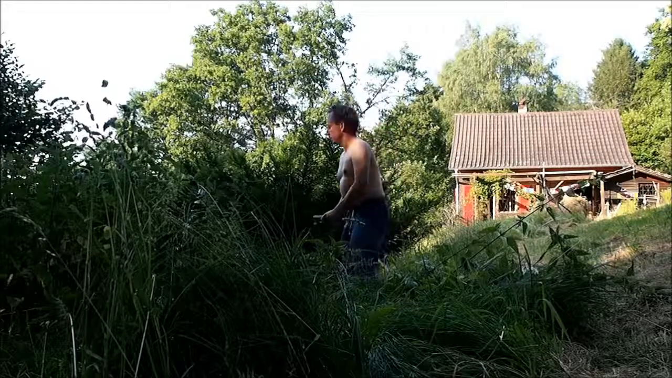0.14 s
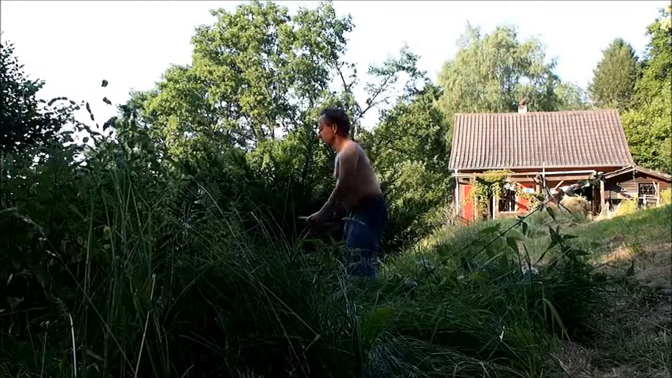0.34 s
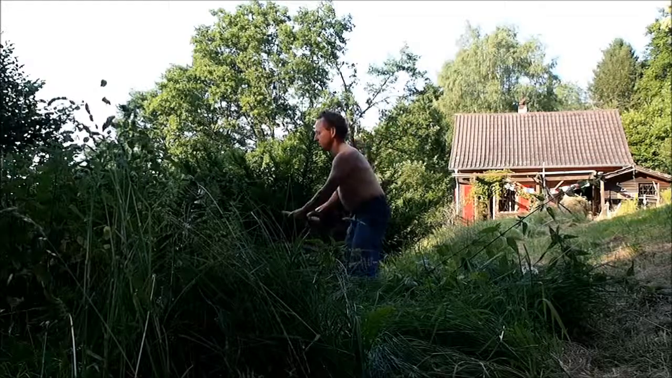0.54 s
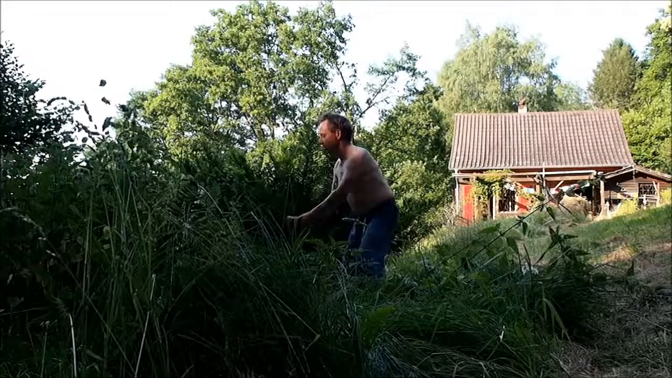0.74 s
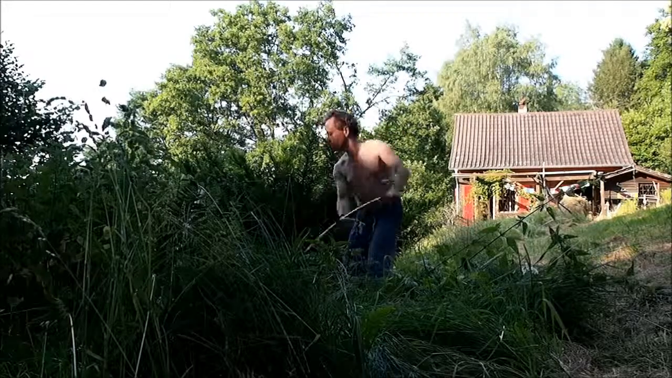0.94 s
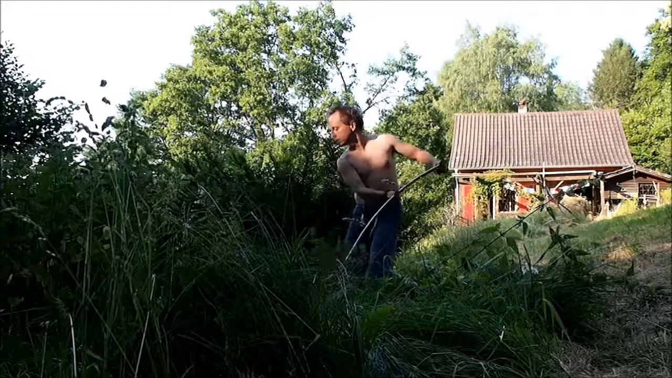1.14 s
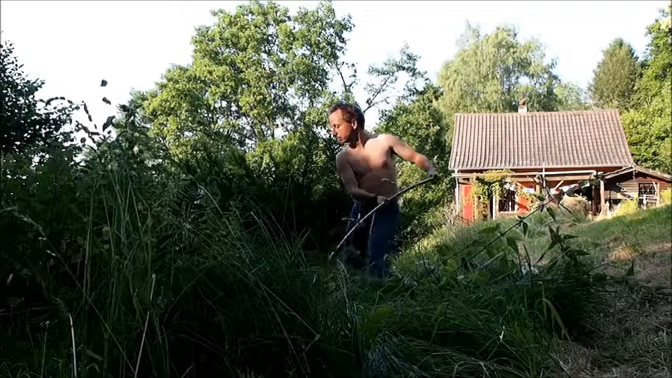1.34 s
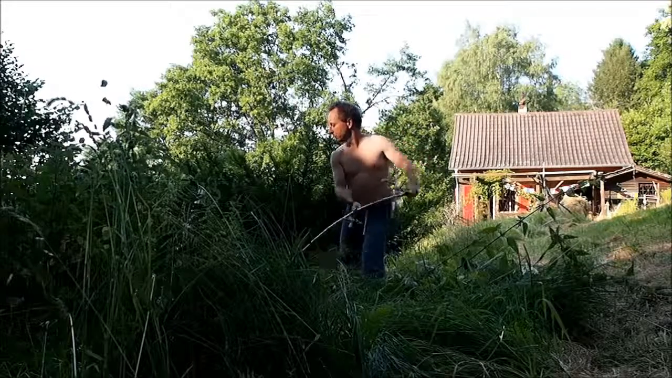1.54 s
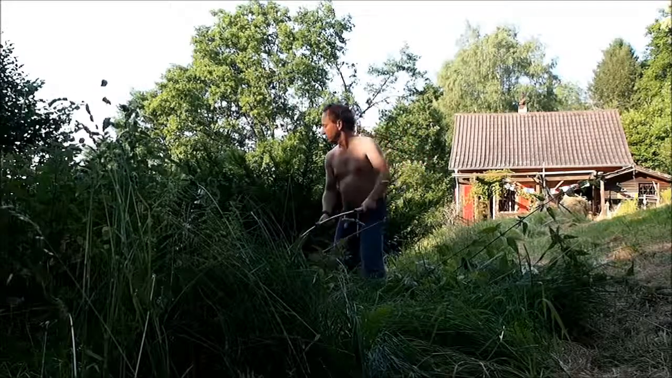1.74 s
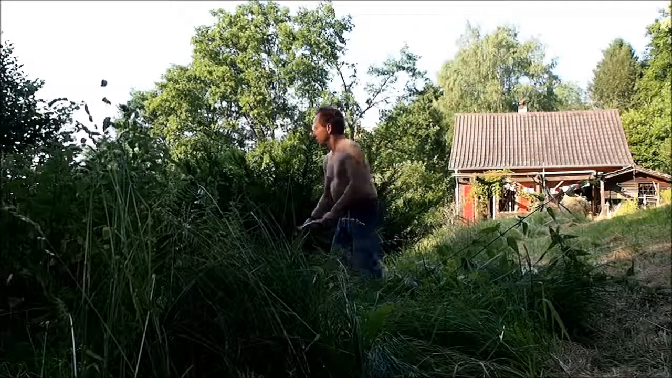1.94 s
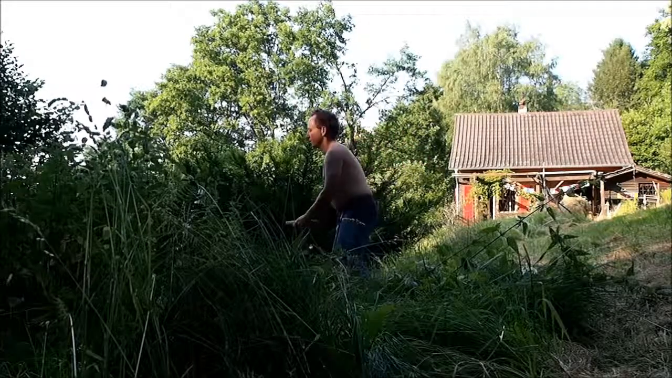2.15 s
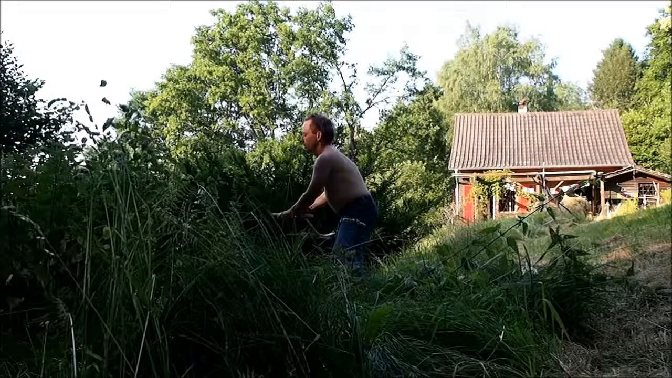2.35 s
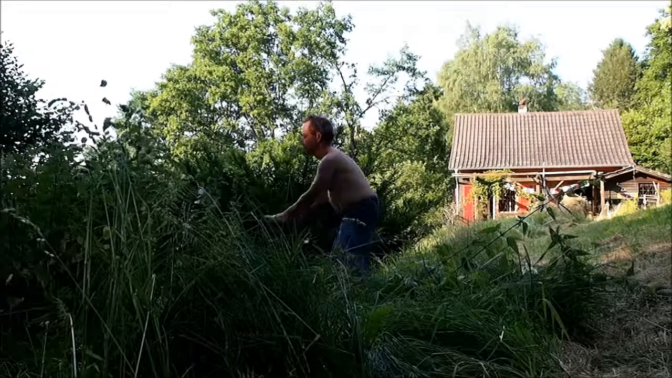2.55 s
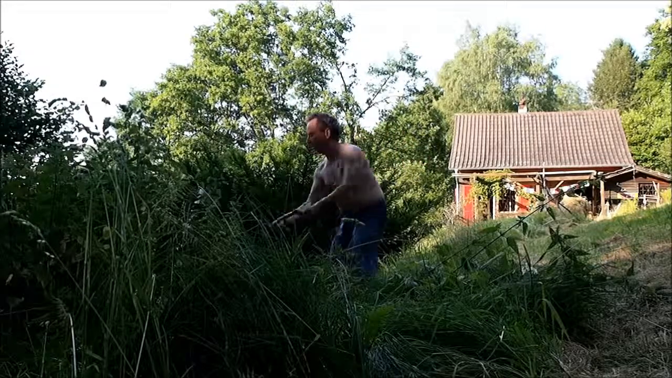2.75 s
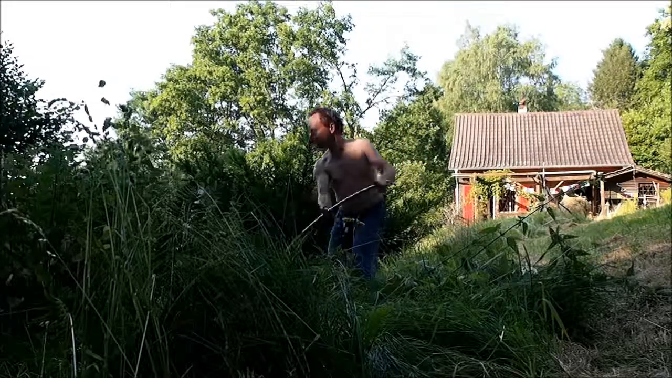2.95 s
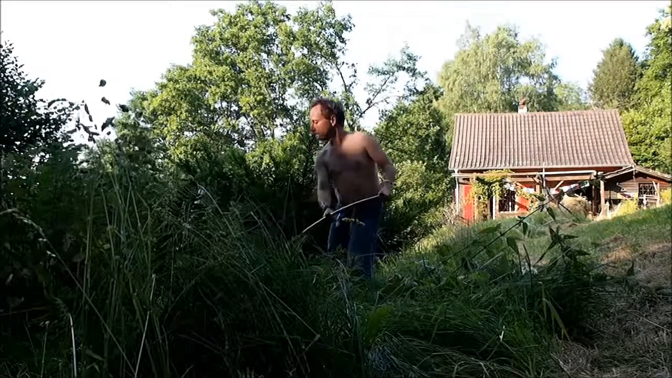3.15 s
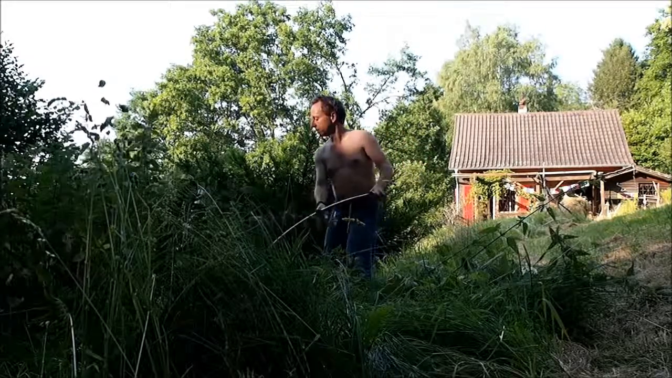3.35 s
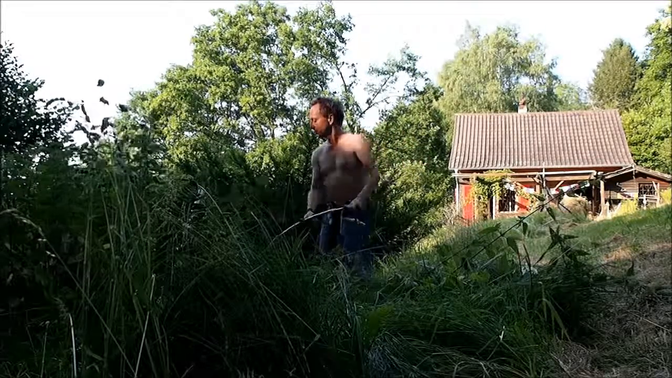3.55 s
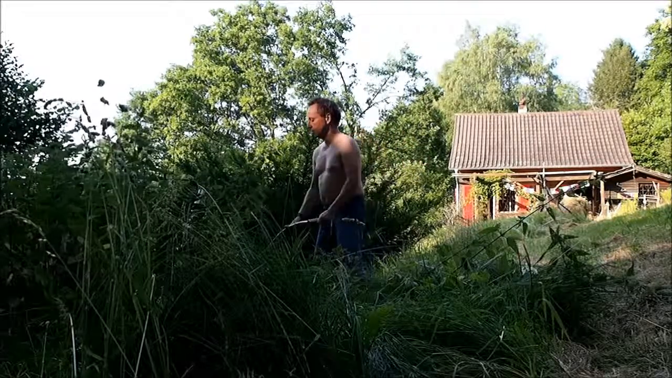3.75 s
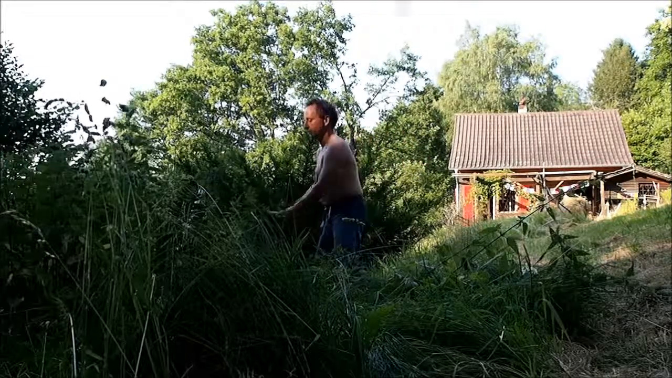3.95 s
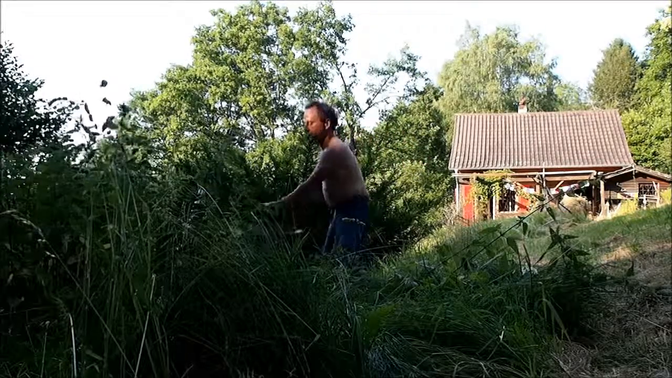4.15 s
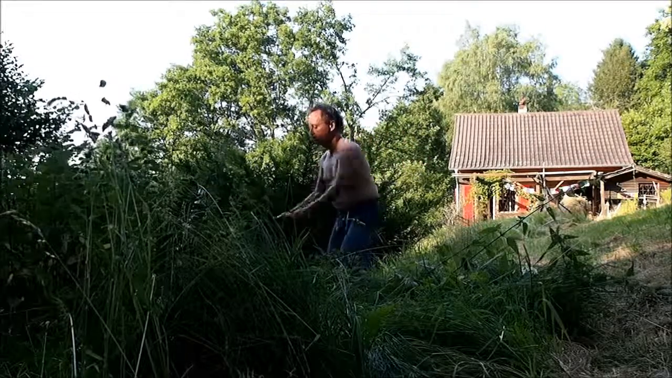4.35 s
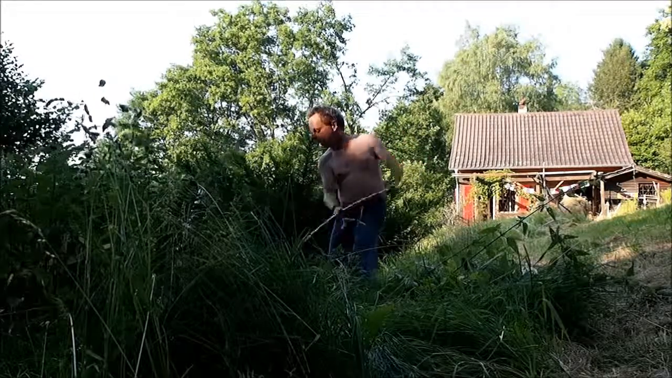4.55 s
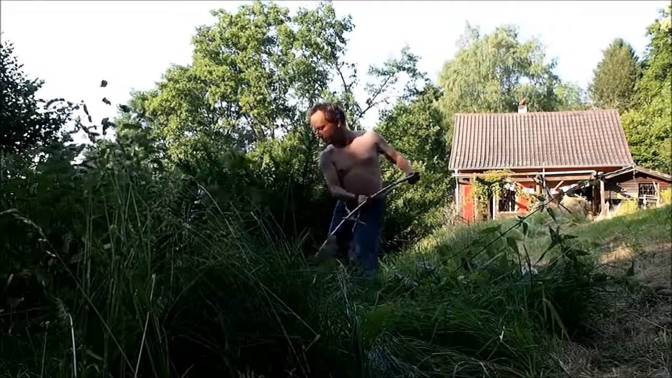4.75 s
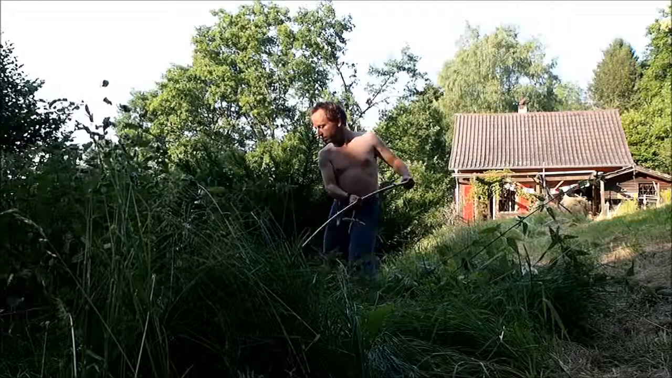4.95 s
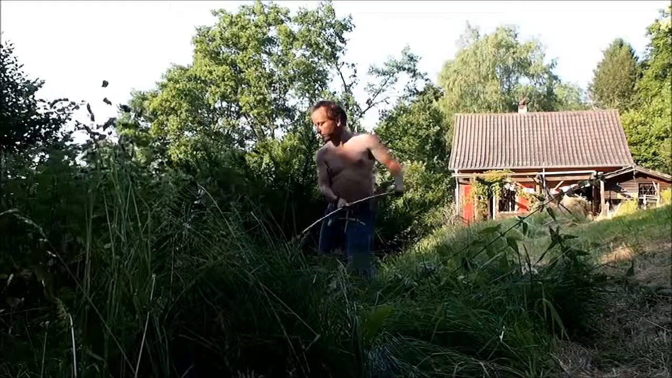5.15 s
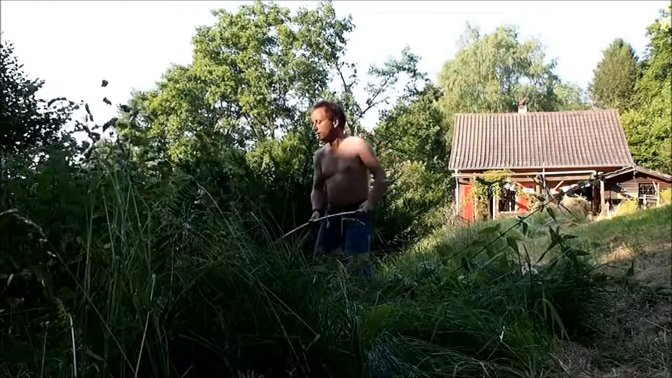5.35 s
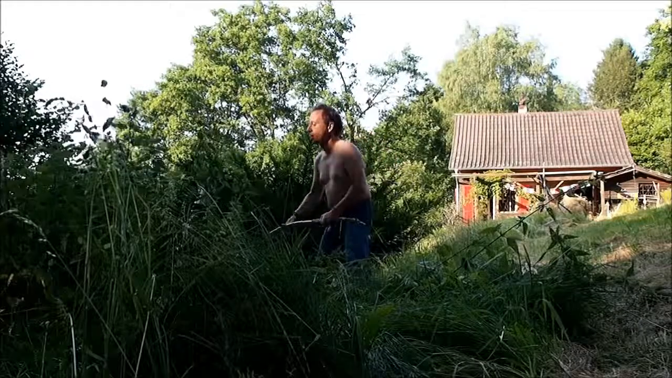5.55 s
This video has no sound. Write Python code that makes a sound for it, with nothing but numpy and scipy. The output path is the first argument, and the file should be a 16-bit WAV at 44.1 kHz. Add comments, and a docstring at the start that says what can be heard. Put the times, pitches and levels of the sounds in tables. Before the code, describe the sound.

A steady, broad rush of open air fills the stereo space, with grass stirring very faintly. In the first 0.8 seconds there are light tussock rustles and tiny dry snaps. At about 0.8 seconds the scythe bites: a quick, bright hiss swells with crunching stalks, crackling tufts and a soft low thud, gone by 1.1. The blade then draws back through cut grass, a softer rustle until about 1.7, with steel pings, stubble scraping and slight wooden knocks around 1.6 to 1.85. Faint brushing follows. A second, shorter and more abrupt stroke comes at 2.7, with sharp stem snaps and a damped metallic touch, then a rustling return from 3.0 to 3.5 and a brief brush near 3.6. The third stroke slices at 4.4 to 4.6, followed by a longer, gradually duller return until 5.6, with delicate steel ticks and handle knocks near 5.2 and 5.4.

```python
"""A scythe mows tall grass on a mountain meadow over the steady rush of the open air, filtered noise.
At first tussocks rustle as grains of rubbing fibre, and dry stems snap as resonant clicks.
Then come three strokes: fibre clicks hiss and crunch, tufts burst in decaying cracks, the swath thuds.
During and after the strokes, touches excite the blade's decaying modes. After each, the blade is drawn
back through rustling cut grass; stubble ticks along the steel and a few knocks ring the wooden handle."""
import sys
import numpy as np
from scipy import signal
from scipy.fft import rfft, irfft, next_fast_len
from scipy.io import wavfile

SR = 44100
rng = np.random.default_rng(int(sys.argv[2]) if len(sys.argv) > 2 else 0)


def unload_wav(signal):
    """Save mono or channel-first audio to the path in sys.argv[1] as 16-bit WAV at rate SR, clipped to [-1, 1]."""
    wavfile.write(
        sys.argv[1],
        SR,
        np.round(np.clip(np.atleast_2d(signal).T, -1, 1) * 32767).astype(np.int16),
    )


N = 250929
TIME = np.arange(N) / SR

# Spectrum of the open air: f/Hz, relative level per Hz/dB
AIR_SPECTRUM = [(15, -43), (25, -31), (59, -1), (185, -4), (242, -9), (277, -7), (394, -12.5), (607, -6.5),
                (775, -6.5), (1130, -6), (1790, -11.5), (3250, -12), (5140, -17), (6560, -15),
                (16000, -25.5)]
# Share of power common to left and right in the open air: f/Hz, correlation/1
AIR_CORRELATION = [(30, 0.96), (100, 0.91), (500, 0.71), (1100, 0.7), (1800, 0.24), (3500, 0.028),
                   (15000, .05)]
# The same share for the grass: f/Hz, correlation/1
GRASS_CORRELATION = [(130, 0.86), (640, 1), (1300, 0.84), (2000, 0.83), (3000, 0.76), (4100, 0.53),
                     (6200, 0.74), (7500, 0.36), (11500, 0.17), (12800, 0), (15000, 0.02)]
# Left-right level difference of the near sounds: f/Hz, level/dB
STEREO_BALANCE = [(100, -0.5), (900, 1.1), (1900, -3), (2600, 0), (3600, -3), (5500, 0.3), (7200, -2.5),
                  (9500, 3), (11000, 1), (12100, -2), (13300, 9), (15000, -7)]
# Single tussocks brushed: middle t/s, rustle level/dB, Gaussian half length/s, treble level re rustle/dB
TUSSOCK_BRUSHES = [(0.01, -59.5, 0.02, 4.5), (0.423, -55, 0.075, -1.5), (0.73, -61, 0.027, -3),
                   (0.82, -50, 0.009, 3), (1.62, -38.5, 0.04, -6), (1.835, -43.5, 0.03, -7),
                   (2.12, -57, 0.066, 1), (2.296, -53, 0.055, -1), (2.575, -53.5, 0.13, -6),
                   (3.615, -40, 0.007, -11), (3.72, -47, 0.053, -6), (4.942, -41.5, 0.046, -0.5),
                   (5.243, -43, 0.051, -13)]
# Blade drawn back through the cut grass: start t/s, end t/s, rustle level/dB
RETURN_SWEEPS = [(1.123, 1.68, -42), (2.972, 3.504, -41.5), (4.714, 5.614, -42.5)]
# Spectrum of the rustle: f/Hz, relative level per Hz/dB
RUSTLE_SPECTRUM = [(100, -7.5), (250, -5.5), (420, -13), (620, -6), (1200, 2.5), (2100, -3.5), (2900, -2),
                   (4000, 1.5), (5500, 0.5), (7000, -5), (9000, -10.5), (16000, -32)]
# Spectrum of its treble: f/Hz, relative level per Hz/dB
RUSTLE_TREBLE_SPECTRUM = [(3000, -18), (6500, -0.5), (8500, 0.5), (11000, -2), (12600, -8), (14000, -5.5),
                          (16000, -10)]
# Resonances colouring the rustle: f/Hz, bandwidth/Hz, mean level/dB
RUSTLE_RESONANCES = [(3095, 270, 3.5), (6310, 550, 2)]
# Single dry stems snapping: t/s, relative level/dB, left-right level/dB
STEM_SNAPS = [(0.3975, -29, -3), (0.7642, -27.5, -4), (1.0218, -8, 2), (1.1018, -8.5, -2),
              (1.5896, -14.5, 2), (2.726, -6, 3), (2.801, -1, 4), (2.8865, -3, 5), (2.906, -11, 3),
              (3.6114, -31, -1.5), (4.9544, -21, -0.5)]
# Cutting strokes: first contact t/s, full speed t/s, leaving the stand t/s, rise to full speed/dB,
# sag as grass slows the blade/(dB/s), relative levels of hiss, crunch and thud/dB,
# treble spray re hiss/dB, spray delay after contact/s
CUTTING_STROKES = [ (0.803, 0.89, 1.09, 30, 52, -20, -29.5, -41.5, 4, 0.08),
                   (2.682, 2.797, 2.858, 14.3, 20, -21, -29, -42, 5.5, 0.03),
                   (4.402, 4.491, 4.598, 27, 62, -18.2, -27.6, -37.5, 3, 0.1)]
# Spectrum of sheared thin blades: f/Hz, relative level per Hz/dB
SHEAR_SPECTRUM = [(900, -39), (2100, -9.5), (2700, 1), (4000, -0.5), (5500, 1), (7000, -2), (8000, -1.5),
                  (11000, -4), (12600, -11), (14000, -8.5), (16000, -14)]
# Spectrum of crunching thick stalks: f/Hz, relative level per Hz/dB
CRUNCH_SPECTRUM = [(250, -29), (430, -18.5), (580, -3.5), (780, -6.5), (1050, 2.5), (1500, 3.5), (2000, -5),
                   (2800, -8), (5000, -29)]
# Spectrum of the shoved swath: f/Hz, relative level per Hz/dB
THUD_SPECTRUM = [(30, -32), (70, -3), (130, 5.5), (260, 4.5), (340, -0.5), (450, -26), (900, -33)]
# Resonances colouring the cutting hiss: f/Hz, bandwidth/Hz, mean level/dB
SHEAR_RESONANCES = [(2800, 27, -3), (3130, 120, -2.5), (3460, 18, 3), (4420, 31, -14), (4540, 33, -3),
                    (4870, 57, 0), (5400, 37, -12), (6170, 310, -6), (6800, 82, 4.5)]
# Resonances of the thick stalks: f/Hz, bandwidth/Hz, mean level/dB
STALK_RESONANCES = [(1250, 120, -12), (1830, 48, 2), (1874, 18, 2.5)]
# Edge biting into tufts: t/s, relative level/dB, stalk f/Hz, bandwidth/Hz, relative pitched level/dB
TUFT_BITES = [(0.830, -17.5, 3980, 100, -10), (0.867, -13, 1320, 110, 3.5), (0.869, -18, 3050, 500, 9),
              (0.899, -2, 1820, 100, -10), (0.918, -18, 1330, 120, 5), (0.935, -17, 2820, 150, 8),
              (0.978, -11.5, 3040, 200, 4.5), (2.684, -21.5, 1320, 300, 4), (2.7134, -12.5, 3670, 900, 3),
              (2.764, -9, 3200, 150, -8), (2.785, -17, 3130, 100, 8), (2.867, -7, 3300, 200, -6),
              (4.400, -25, 3900, 300, -2), (4.417, -20.5, 3300, 600, 4), (4.464, -23, 3370, 800, 10),
              (4.466, -22, 1870, 400, 12.5), (4.477, -16, 2680, 700, 13), (4.481, -19, 3560, 60, 5),
              (4.522, -8, 4630, 100, 0)]
# Touches on the steel: t/s, relative level/dB, most excited f/Hz, share of free ring time left by grass/1
STEEL_TOUCHES = [(0.831, -19, 3950, 0.8), (1.567, -20, 3044, 0.6), (1.599, -20, 3790, 0.8),
                 (1.630, -23.5, 2722, 0.95), (1.649, -22.5, 4160, 1), (1.652, -22, 5300, 1),
                 (1.69, -25.5, 4170, 1), (1.796, -25, 3790, 0.7), (1.83, -31, 2722, 1),
                 (1.836, -23.5, 6192, 0.8), (2.685, -6, 6500, 0.19), (2.713, -10, 3950, 0.54),
                 (3.269, -28, 3044, 0.6), (3.703, -34, 3044, 0.6), (4.417, -18, 3512, 1),
                 (5.245, -29, 2722, .9), (5.246, -30, 3512, 1), (5.279, -30, 3044, 1),
                 (5.28, -29, 4420, 0.85), (5.394, -28, 3044, 0.5), (5.409, -30.5, 2722, 0.9)]
# Modes of the free blade: f/Hz, relative level/dB, t60/s
BLADE_MODES = [(2722, 0, .45), (3044, -1, .35), (3512, -3, .2), (3790, -4, .3), (3950, -4, .25),
               (4091, -3, .36), (4204, -2, .36), (4400, -3, .4), (4762, -6, .4), (5120, -5, .3),
               (5459, -5, .27), (6192, -2, .2), (6500, -6, .15), (7005, -5, .22), (7700, -9, .28)]
# Blade dragging over stubble: middle t/s, relative level/dB, Gaussian half length/s
STUBBLE_SCRAPES = [(1.604, -36, 0.023), (1.666, -38.5, 0.026), (1.798, -41, 0.011), (3.273, -48, .012),
                   (5.175, -39.5, 0.028), (5.27, -48, 0.021)]
# Knocks on the wooden handle: t/s, relative level/dB
HANDLE_KNOCKS = [(1.699, -29), (1.731, -33), (3.611, -36), (5.243, -31), (5.389, -31.5)]
# Modes of the handle: f/Hz, relative level/dB, t60/s
HANDLE_MODES = [(1065, -1, 0.039), (1500, -9, 0.033), (1920, -3, 0.048), (2520, -3, 0.029),
                (3100, -17, 0.018), (3750, 2, 0.024)]

AIR_DB = -46.5   # before the level given in scene()
STIR_DB, STIR_TREBLE_DB = -59.5, -9.5   # the standing grass never quite rests
RETURN_ATTACK_S, RETURN_RELEASE_DB_PER_S = 0.035, 85
RETURN_TREBLE_DB, DULLING_DB_PER_S = -3, -4.5   # treble re the rustle, duller as the swath settles
EXIT_DB, EXIT_S, RELEASE_DB_PER_S = 3, 0.024, 92.5   # the edge comes free, then the cut dies away
CRUNCH_LEAD_S, THUD_LAG_S = 0.0021, 0.018   # thick stalks part first, the swath follows
SPRAY_START_DB, SPRAY_RISE_S = -4, 0.016   # treble is held back until the blade gathers speed
TUFT_T60_S = 0.09
CUTOFF_HZ = 15900


def from_db(db):
    """Amplitude ratio of a level in decibels."""
    return 10 ** (np.asarray(db) / 20)


def rms_one(x):
    """Normalization to unit mean power."""
    return x / np.sqrt(np.mean(x ** 2) + 1e-20)


def at_hz(points, hz):
    """Linear interpolation along a logarithmic frequency axis."""
    f, value = np.transpose(points)
    return np.interp(np.log(np.maximum(hz, 1)), np.log(f), value)


def drift(rate):
    """Noise through a double pole at `rate` Hz: a smooth random fluctuation of unit rms."""
    r = np.exp(-2 * np.pi * min(rate, 2000) / SR)
    settled = signal.lfilter([1], [1, -2 * r, r * r], rng.standard_normal(N + SR))[SR:]
    return rms_one(settled)


def colour(x, gain_at, size=4096):
    """Minimum-phase filtering: folding the cepstrum makes the given magnitude response causal."""
    hz = np.arange(size // 2 + 1) * SR / size
    cepstrum = irfft(np.log(gain_at(hz) + 1e-6))
    cepstrum[1:size // 2] *= 2
    cepstrum[size // 2 + 1:] = 0
    impulse_response = irfft(np.exp(rfft(cepstrum)))
    return signal.oaconvolve(x, impulse_response[None], axes=-1)[:, :N]


def resonate(x, hz, width):
    """A two-pole resonator, whose bandwidth sets its damping, with about unit gain at its peak."""
    r = np.exp(-np.pi * width / SR)
    zeros = np.array([1, 0, -1]) * (1 - r * r) / 2
    poles = [1, -2 * r * np.cos(2 * np.pi * hz / SR), r * r]
    return signal.lfilter(zeros, poles, x + 1e-18)


def two_ears(x, correlation):
    """Partial coherence: one shared row and one private row per side mix by frequency."""
    share = lambda hz: np.clip(at_hz(correlation, hz), .01, .99)
    common = colour(x[:1], lambda hz: np.sqrt(share(hz)))
    private = colour(x[1:], lambda hz: np.sqrt(1 - share(hz)))
    return common + private


def fibres(per_s, spread_db, clump_db, smooth):
    """Shot noise: random clicks of breaking and rubbing fibres, in clumps, over a scattered hiss."""
    clicks = np.zeros((3, N))
    sizes, hiss = rng.random((2, 3, N), dtype=np.float32)
    born = rng.random((3, N), dtype=np.float32) < per_s / SR
    click_db = spread_db * np.minimum(-np.log(sizes[born] + 1e-9), 4)
    clicks[born] = from_db(click_db) * np.sign(hiss[born] - .5)
    grains = rms_one(clicks) + smooth * rms_one(hiss - .5)
    return grains * from_db(clump_db * drift(52))


def voiced(x, spectrum, resonances=(), wander_db=4.0):
    """Source and filter: coloured grains drive resonances whose levels wander; rms 1."""
    x = colour(two_ears(x, GRASS_CORRELATION), lambda hz: from_db(at_hz(spectrum, hz)))
    knots = np.linspace(0, TIME[-1], 90)
    wander = lambda: np.interp(TIME, knots, rng.standard_normal(90))
    ringing = sum(from_db(db + wander_db * wander()) * resonate(x, hz, width)
                  for hz, width, db in resonances)
    return rms_one(x + ringing)


def open_air(level_db, dip_hz, dip_width_hz, dip):
    """Broadband far rush of the valley; a subtracted resonance is the hollow left by the ground echo."""
    noise = two_ears(rng.standard_normal((3, N)), AIR_CORRELATION)
    rush = colour(noise, lambda hz: from_db(at_hz(AIR_SPECTRUM, hz)))
    return from_db(AIR_DB + level_db) * rms_one(rush - dip * resonate(rush, dip_hz, dip_width_hz))


def hollow_stalks(per_s, spread_db, low_hz, high_hz, cycles, count=36):
    """Impulse excitation: each popping stalk rings briefly at one of `count` pitches; rms 1."""
    sizes = from_db(spread_db * np.minimum(rng.exponential(1, N), 3))
    pops = sizes * rng.choice([-1, 1], N) * (rng.random(N) < per_s / SR)
    dealt = rng.integers(0, count, N)   # which pitch each pop excites
    pitches = np.geomspace(low_hz, high_hz, count)
    return rms_one(sum(resonate(pops * (dealt == k), hz, hz / cycles) / hz
                       for k, hz in enumerate(pitches)))


def brushing(stalk_pops):
    """Friction noise of stirring grass, brushed tussocks and returns; independent powers add."""
    parts = [(from_db(STIR_DB) * np.ones(N), STIR_TREBLE_DB)]   # (gain, treble level/dB)
    for start, end, db in RETURN_SWEEPS:
        attack = np.clip((TIME - start) / RETURN_ATTACK_S, 0, 1)
        gain = attack * from_db(db - RETURN_RELEASE_DB_PER_S * np.maximum(TIME - end, 0))
        dulling_db = DULLING_DB_PER_S * np.clip(TIME - start, 0, end - start)
        parts.append((gain, RETURN_TREBLE_DB + dulling_db))
    for middle, db, half, treble_db in TUSSOCK_BRUSHES:
        swell = np.exp(-.5 * ((TIME - middle) / half) ** 2)
        parts.append((from_db(db) * swell, treble_db))
    body_gain = np.sqrt(sum(gain ** 2 for gain, _ in parts))
    treble_gain = np.sqrt(sum((gain * from_db(treble_db)) ** 2 for gain, treble_db in parts))
    body_grains = fibres(per_s=6000, spread_db=5.5, clump_db=0.84, smooth=1.4)
    rustle = from_db(1) * voiced(body_grains, RUSTLE_SPECTRUM, RUSTLE_RESONANCES)
    treble_grains = fibres(per_s=2300, spread_db=3.5, clump_db=1.0, smooth=1.5)
    treble = from_db(4.0) * voiced(treble_grains, RUSTLE_TREBLE_SPECTRUM)
    return body_gain * (rustle + from_db(-18.5) * stalk_pops) + treble_gain * treble


def snaps(level_db, hz, width_hz, t60):
    """Brittle fracture: an impulse and decaying splinter noise drive one broad resonance."""
    out, t = np.zeros((2, N)), TIME[:SR // 30]
    for s, db, pan_db in STEM_SNAPS:
        splinters = 0.22 * rng.standard_normal((2, len(t))) * from_db(-60 * t / t60)
        splinters[:, 0] = 1
        click = resonate(splinters, hz, width_hz)
        side_db = np.minimum([[pan_db], [-pan_db]], 0)   # attenuates the farther side
        at = round(s * SR)
        out[:, at:at + len(t)] += click / abs(click).max() * from_db(db + level_db + side_db)
    return out


def swing(lag_s):
    """Cutting gain, one row per stroke: it builds with speed, sags under load and decays once free."""
    rows = []
    t = TIME - lag_s
    for touch, full, leave, rise_db, sag_db_per_s, *_ in CUTTING_STROKES:
        db = -rise_db * np.maximum(full - t, 0) / (full - touch)
        db -= sag_db_per_s * np.clip(t - full, 0, leave - full)
        db -= EXIT_DB * np.clip((t - leave) / EXIT_S, 0, 1)
        db -= RELEASE_DB_PER_S * np.maximum(t - leave, 0)
        onset = np.clip((TIME - touch) / 0.0039, 0, 1)
        rows.append(from_db(np.maximum(db, -150)) * onset)
    return np.array(rows)


def strokes(stalk_pops):
    """Shear fracture: thin blades hiss, thick stalks crunch and pop, and the shoved swath thuds."""
    touch, *_, hiss_db, crunch_db, thud_db, spray_db, spray_delay = np.transpose(CUTTING_STROKES)
    cutting = swing(0)
    speed = (1 + np.tanh((TIME - (touch + spray_delay)[:, None]) / SPRAY_RISE_S)) / 2
    spray_gain = from_db(SPRAY_START_DB + (spray_db[:, None] - SPRAY_START_DB) * speed)
    shear_grains = fibres(per_s=5700, spread_db=2.5, clump_db=1.0, smooth=0.93)
    shear = voiced(shear_grains, SHEAR_SPECTRUM, SHEAR_RESONANCES)
    highpass = signal.butter(1, 8000, "high", fs=SR, output="sos")
    spray = signal.sosfilt(highpass, shear)
    hiss = from_db(hiss_db) @ cutting * shear
    hiss = hiss + from_db(hiss_db) @ (cutting * (spray_gain - 1)) * spray
    crunch_grains = fibres(per_s=2000, spread_db=3.5, clump_db=0.5, smooth=0.67)
    crunch = from_db(-0.8) * voiced(crunch_grains, CRUNCH_SPECTRUM, STALK_RESONANCES)
    crunch = crunch + from_db(-5) * stalk_pops
    thud = voiced(fibres(per_s=600, spread_db=3, clump_db=0.0, smooth=0.43), THUD_SPECTRUM)
    crunch_gain = from_db(crunch_db) @ swing(-CRUNCH_LEAD_S)
    thud_gain = from_db(thud_db) @ swing(THUD_LAG_S)
    return hiss + crunch_gain * crunch + thud_gain * thud


def tufts(crack_db, pitched_db):
    """Collective fracture: a sudden, decaying volley of cracks, pitched by resonant hollow stalks."""
    out = np.zeros((2, N))
    volley = fibres(per_s=4000, spread_db=1.0, clump_db=2.8, smooth=1.0)
    cracks = voiced(volley, SHEAR_SPECTRUM, SHEAR_RESONANCES)
    plain = two_ears(volley, GRASS_CORRELATION)
    cracks = cracks + from_db(-13.5) * voiced(volley, CRUNCH_SPECTRUM, STALK_RESONANCES)
    t = TIME[:SR // 4]
    for s, db, hz, width, share_db in TUFT_BITES:
        at = round(s * SR)
        span = slice(at, at + len(t))
        stalks = rms_one(resonate(plain[:, span], hz, width))
        burst = from_db(crack_db) * cracks[:, span] + from_db(pitched_db + share_db) * stalks
        out[:, span] += from_db(db - 60 * t / TUFT_T60_S) * burst
    return out


def blade(level_db, focus_db, reach_hz, scrape_s):
    """Modal excitation: a short scrape rings damped steel modes, most strongly near one pitch."""
    out = np.zeros((2, N))
    mode_hz, mode_db, t60 = np.transpose(BLADE_MODES)[:, :, None]
    t = TIME[:SR // 2]
    for s, db, hz, free in STEEL_TOUCHES:
        near_db = focus_db * (np.exp(-((mode_hz - hz) / reach_hz) ** 2) - 1)
        phase = rng.uniform(0, 2 * np.pi, mode_hz.shape)
        phase = phase + rng.normal(0, 0.19, (2,) + mode_hz.shape)   # slight left-right difference
        decay_db = 60 * t / (t60 * np.clip(free, .05, 1))
        envelope = from_db(db + level_db + mode_db + near_db - decay_db)
        rings = envelope * np.sin(2 * np.pi * mode_hz * t + phase)
        at = round(s * SR)
        touch = rings.sum(axis=1) * (1 - np.exp(-t / scrape_s))
        out[:, at:at + len(t)] += touch[:, :N - at]
    return out


def scrapes(level_db, grit_db, width_hz, low_hz, high_hz, count=26):
    """Frictional excitation: stubble ticks give bare grit and drive many half-damped steel modes."""
    out, t = np.zeros((2, N)), TIME[:SR // 3]
    grit = voiced(fibres(per_s=580, spread_db=0.5, clump_db=-5.5, smooth=.2), SHEAR_SPECTRUM)
    modes = np.linspace(low_hz, high_hz, count) + rng.uniform(-82, 93, count)
    for s, db, half in STUBBLE_SCRAPES:
        at = round(s * SR) - SR // 10
        span = slice(at, at + len(t))
        pressure = np.exp(-.5 * ((TIME[span] - s) / half) ** 2)
        rub = from_db(db) * pressure * grit[:, span]
        shimmer = sum(resonate(rub, hz, width_hz) for hz in modes)
        out[:, span] += from_db(grit_db) * rub + from_db(level_db) * shimmer
    return out


def handle(level_db):
    """Modal excitation: each knock rings the short, strongly damped modes of the wood."""
    out, t = np.zeros(N), TIME[:SR // 10]
    for s, db in HANDLE_KNOCKS:
        at = round(s * SR)
        for hz, mode_db, t60 in HANDLE_MODES:
            envelope = from_db(db + level_db + mode_db - 60 * t / t60)
            out[at:at + len(t)] += envelope * np.sin(2 * np.pi * hz * t) * rng.choice([-1, 1])
    return out


def microphones(x, lag_s):
    """Interchannel differences: two capsules differ in colour, and sound reaches the right one later."""
    left = colour(x[:1], lambda hz: from_db(at_hz(STEREO_BALANCE, hz) / 2))
    right = colour(x[1:], lambda hz: from_db(-at_hz(STEREO_BALANCE, hz) / 2))
    size = next_fast_len(N + SR)
    delay = np.exp(-2j * np.pi * np.fft.rfftfreq(size, 1 / SR) * lag_s)   # linear phase
    right = irfft(rfft(right, size) * delay, size)[:, :N]
    return np.vstack([left, right])


def scene():
    """Superposition: the mower's sounds near the middle add to the open air all round."""
    stalk_pops = hollow_stalks(per_s=320, spread_db=2.5, low_hz=1893, high_hz=7530, cycles=110)
    air = open_air(level_db=0.6, dip_hz=392, dip_width_hz=140, dip=0.38)
    grass = brushing(stalk_pops) + snaps(level_db=-1.0, hz=7600, width_hz=8500, t60=0.018)
    grass = grass + strokes(stalk_pops) + tufts(crack_db=-16, pitched_db=-14.0)
    scythe = blade(level_db=-9.0, focus_db=16, reach_hz=170, scrape_s=0.0017)
    scythe = scythe + scrapes(level_db=12.5, grit_db=-3, width_hz=16, low_hz=3300, high_hz=8480)
    scythe = scythe + handle(level_db=-6.5)
    return microphones(grass + scythe, lag_s=2.2e-5) + air


def record(dry):
    """Amplitude limiting and band limiting: peaks are clipped, then a steep low-pass cuts the top."""
    lowpass = signal.ellip(12, .1, 80, CUTOFF_HZ, fs=SR, output="sos")
    return signal.sosfilt(lowpass, dry.clip(-.85, .85))


dry = scene()
out = record(dry)
unload_wav(out)
```